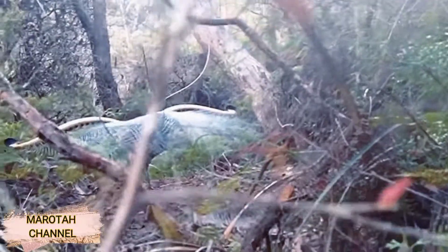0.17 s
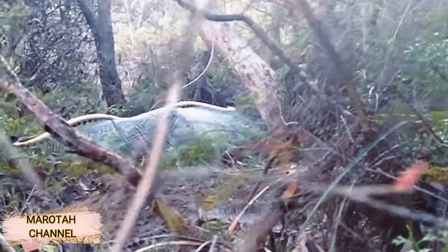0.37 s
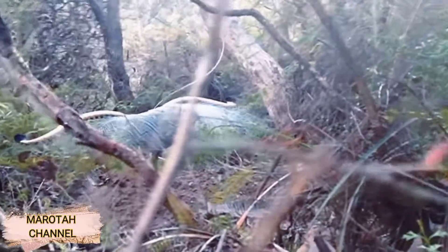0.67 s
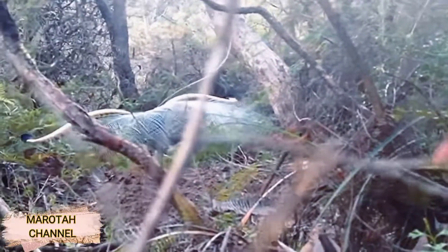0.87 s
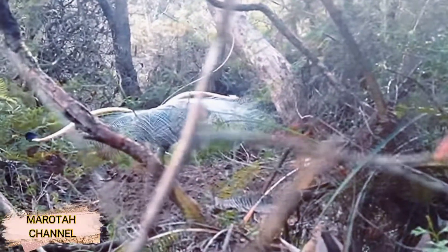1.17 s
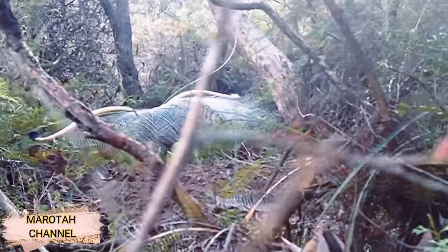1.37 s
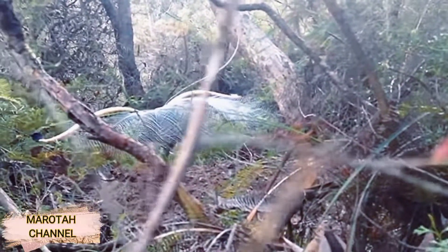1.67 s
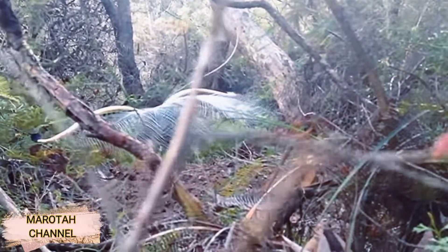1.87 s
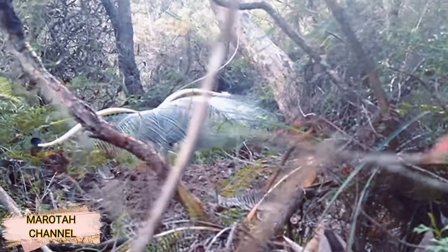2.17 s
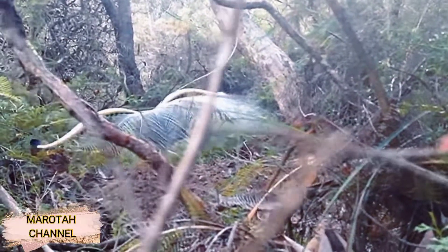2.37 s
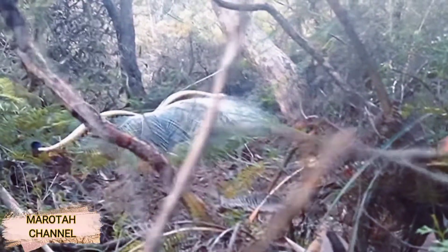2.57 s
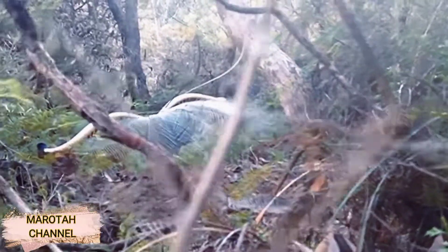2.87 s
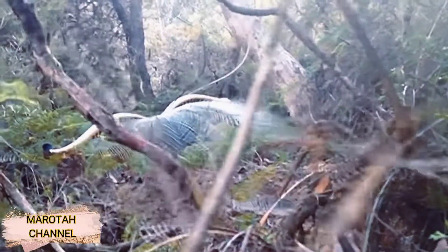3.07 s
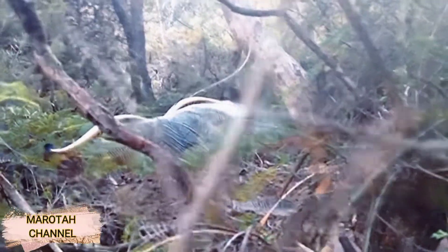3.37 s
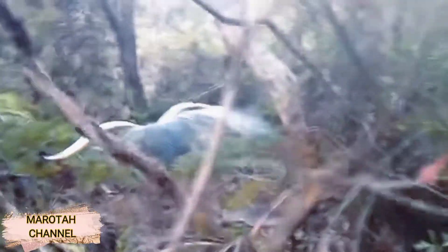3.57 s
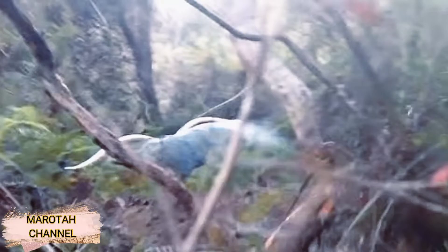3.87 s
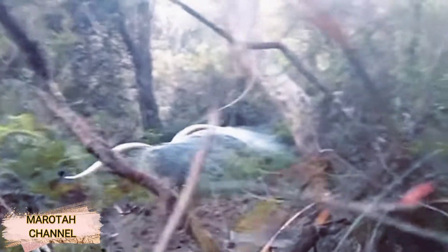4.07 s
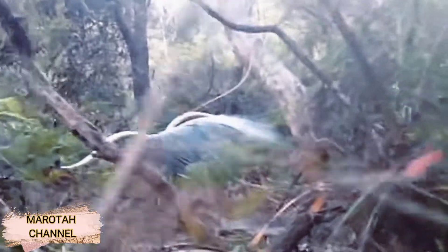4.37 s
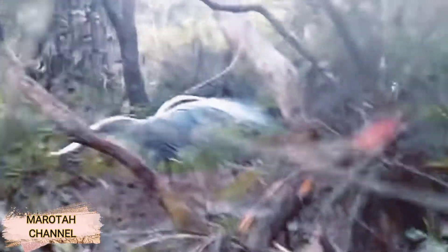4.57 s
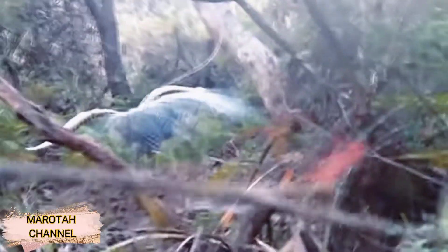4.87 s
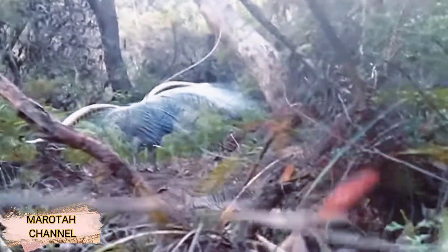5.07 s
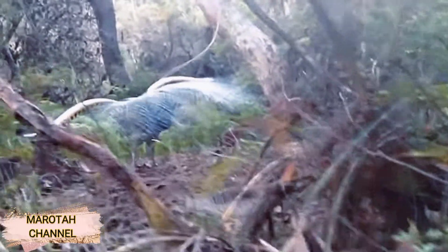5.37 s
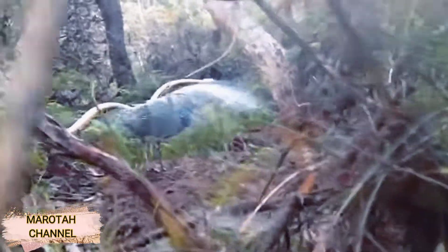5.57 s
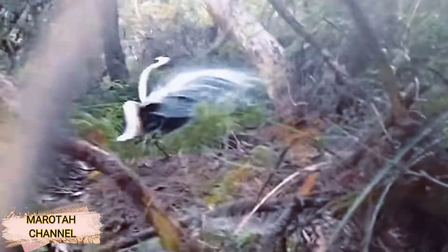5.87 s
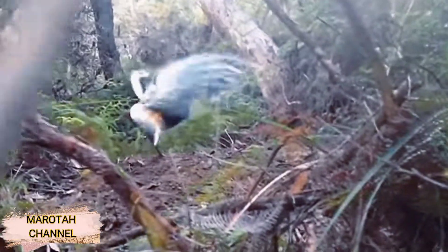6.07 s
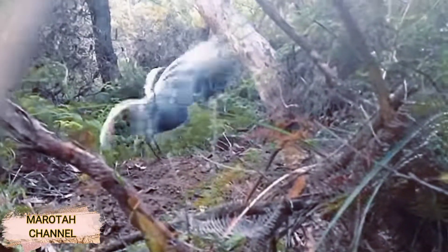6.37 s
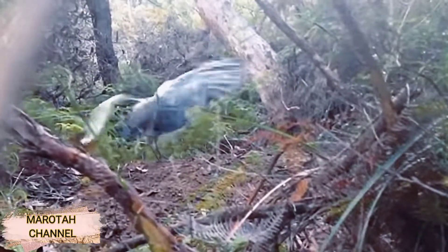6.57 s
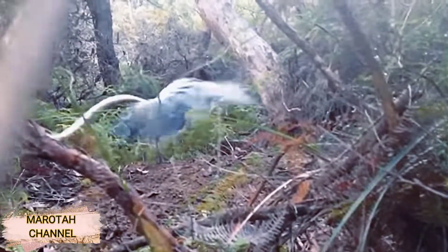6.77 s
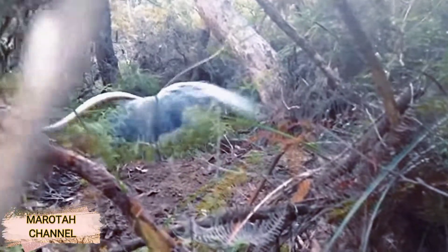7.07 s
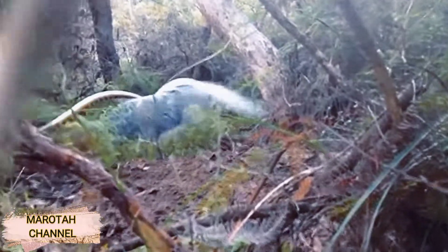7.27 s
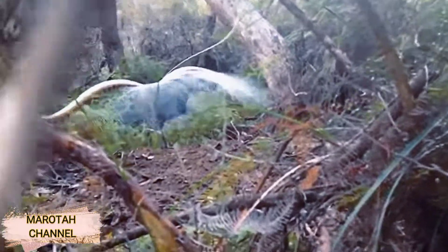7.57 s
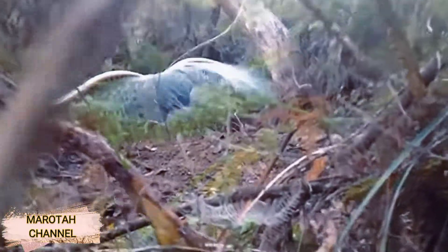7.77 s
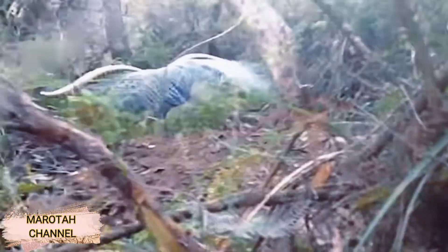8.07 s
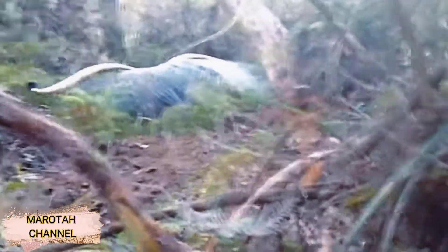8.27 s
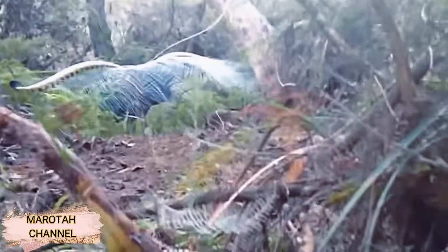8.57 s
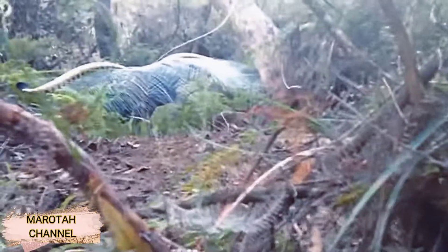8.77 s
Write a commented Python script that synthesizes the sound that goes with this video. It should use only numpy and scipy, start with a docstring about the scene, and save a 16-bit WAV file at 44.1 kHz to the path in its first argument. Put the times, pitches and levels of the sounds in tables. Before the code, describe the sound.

A lyrebird performs a few metres away in a forest, over soft air noise and a faint, distant low drone. It opens with quiet, high, raspy chirps and a sharp click. At about 0.85 seconds, low pops start a loud hiss that lasts until 2.1, ending in a faint trill. Three short, hoarse warbles follow between 2.3 and 2.8. From 3 seconds the bird pours out loud wavering whistles, falling sweeps and trills, mixed with sharp clicks and short rasps, while its feet rustle dry leaves on and off. The song thins to softer chirps and snaps around 5.3 to 6, then bursts into sharp, quick notes, with one steady whistle near 6.9. Chopped buzzes come just after 7 and around 8, alongside a high wavering whistle. Short rough squawks, rasps and clicks fill the rest, until about 8.9. The notes echo briefly off the trees.

```python
"""Lyrebird display in a forest

A few metres away the bird throws whistles and fast warbles from both sides of its syrinx, with a long
hiss, chopped buzzes, squawks, short rasps and clicks, while its feet stir dry litter. Trunks answer
briefly, and a far low drone and air noise lie underneath. Drone, air, litter and echo tail
duck on cue around the loud notes."""
import sys
import numpy as np
from scipy import signal
from scipy.fft import rfft, irfft, next_fast_len
from scipy.io import wavfile
from scipy.ndimage import uniform_filter1d, map_coordinates

SR = 44100
rng = np.random.default_rng(int(sys.argv[2]) if len(sys.argv) > 2 else 0)


def store_pcm(level_fs):
    """Save levels as 16-bit WAV."""
    pcm = np.round(np.clip(level_fs, -1, 1) * 32767).astype(np.int16)
    wavfile.write(sys.argv[1], SR, np.atleast_2d(pcm).T)


N = 392931

# Tone of the far rumble: f/Hz, relative level/dB
DRONE_SPECTRUM = [(15, -55), (25, -74), (47, -4.5), (97, -1), (162, -4.5), (198, -9), (335, -22),
                  (399, -40), (500, -40.5), (650, -77), (1100, -120)]
# Tone of the air: f/Hz, relative level/dB
AIR_SPECTRUM = [(180, -6), (300, -3.5), (900, -9), (978, -13), (1230, -11), (1410, -14), (2100, -10.5),
                (6300, -13), (14700, -18), (16000, -12)]
# Tone of the dry leaves: f/Hz, relative level/dB
LEAF_SPECTRUM = [(240, -43), (400, -3), (839, -0.5), (964, -3.5), (1180, -1.5), (1290, 1), (4110, 1),
                 (14600, -11), (15300, -29), (16000, -38)]
# Fader ride on the drone: t/s, level/dB
DRONE_LEVEL = [(0, -30), (.8, -30), (1.7, -31), (1.8, -22), (2.3, -28.5), (3.1, -26.5), (4.1, -29),
               (4.9, -32), (5.8, -28.5), (6.35, -29.5), (7.7, -27), (8.4, -38), (8.6, -27), (8.91, -32)]
# Bouts of scratching in the litter: t/s, length/s, peak/dB, peak position/0-1, fade/dB
SCRATCHES = [(2.87, 0.53, -24, 0.76, 11), (3.286, 0.93, -22.5, 0.22, 3), (4.127, 1.24, -19, 0.17, 13.5),
             (5.325, 0.92, -22, 0.15, 10), (6.98, 1, -23, 0.59, 13), (8.137, 0.82, -26.5, 0.09, 22)]
# Ducking cues for background, litter and echo tail: t/s, depth/dB, hold/s
DUCKS = [(0.001, 3.5, 0.001), (0.902, 12, 0.99), (3.228, 9.5, 0.083), (3.556, 7.5, 0.21),
         (4.124, 11.5, 0.016), (4.77, 2, 0.32), (5.323, 5, 0.0078), (6.105, 1, 0.041), (6.455, 9.5, .03),
         (6.669, 17, 0.045), (7.126, 10, .01), (7.262, 4, 0.0091), (7.842, 12.5, 0.23), (8.883, 10, .03)]
# First echoes off the nearest trunks: delay/s, relative level/dB
NEAR_TRUNKS = [(.006, -11), (.011, -12), (.017, -20.5), (.026, -17.5)]
# Decay of the echo tail: f/Hz, t60/s
TRUNK_DECAY = [(500, .3), (1800, .5), (2800, .55), (6000, .4), (12000, .2)]
# Echo send, how much of the voice reaches the far trunks: t/s, level/dB
ECHO_SEND = [(0, 3.5), (2.3, 0.5), (2.8, -1.5), (3.3, -1.5), (5.2, -0.5), (5.4, -17), (6.14, 1),
             (6.45, -8.5), (6.6, 9), (6.8, -12), (7.3, -16), (7.8, 4), (8.1, 5.5), (8.4, -0.5), (8.78, 4),
             (8.86, -10), (8.91, -12)]
# Low pops that open the hiss: t/s, level/dB, f/Hz
KNOCKS = [(0.838, -12, 160), (0.845, -17, 151), (0.852, -2, 805), (0.867, -13, 990), (0.875, -1, 151)]
# Envelope of the long hiss: t/s, level/dB, growl relative to the hiss/dB
HISS_LEVEL = [(0.87, -17.5, 4.5), (0.914, -19, -34), (0.928, -18, -20), (0.95, -11.5, -16),
              (1.872, -11, -17.5), (2.006, -16.5, -17), (2.072, -21, -11), (2.1, -42, -8)]
# Throat resonances of the hiss: f/Hz, width/Hz, level/dB
HISS_THROAT = [(1680, 760, -8.5), (2876, 225, -1), (4290, 420, 1.5), (5120, 240, 1.5), (5580, 460, 1),
               (7850, 1360, -8.5), (9010, 1260, -10.5), (11300, 1400, -49)]
# Throat resonances of its low growl, applied twice: f/Hz, width/Hz, level/dB
GROWL_THROAT = [(791, 350, 1), (1090, 450, 5)]
# Clicks and snaps: t/s, peak/dB, ring f/Hz, t60/s, ring share/0-1
CLICKS = [(0.4838, -4.5, 2500, 0.058, 0), (0.7657, -20, 2830, 0.025, 0), (3.0747, -6.5, 2360, 0.026, 0.2),
          (3.1021, -5, 3600, 0.025, 0.45), (3.1918, -6, 2290, 0.017, 0.2), (3.2066, 1.5, 2400, 0.011, 0.16),
          (3.2465, 0.5, 2420, 0.017, 0.24), (3.389, -7.5, 2210, 0.042, 0.58),
          (3.4934, -1.5, 2700, 0.022, 0.6), (4.1363, -0.5, 1805, 0.015, 0.1),
          (4.4057, -8, 1727, 0.045, 0.3), (4.5615, -1.5, 2860, 0.041, 0.26),
          (4.576, -5.5, 1916, 0.014, 0.4), (4.6185, -7, 4860, 0.018, 0.1),
          (4.6374, -1.5, 2930, 0.037, 0.14), (4.7677, 1.5, 3010, 0.013, 0.96),
          (4.8588, -3, 4230, 0.029, 0.43), (4.974, -5, 2520, 0.025, 0.43), (5.1877, -7, 2420, 0.012, 1),
          (5.3171, 2.5, 2870, 0.014, 0.64), (5.3556, -15, 5000, 0.035, 0.6), (5.7357, -7, 2100, 0.11, 0),
          (6.0304, -4, 4820, 0.018, 0.42), (6.398, -3, 1740, 0.034, 0.8), (6.976, -14, 2140, 0.039, 0.47),
          (7.358, -12, 4340, 0.054, 0.1), (7.5297, -9.5, 1930, 0.032, 0), (8.1204, -22, 4260, 0.025, 0.3),
          (8.336, -10.5, 4230, 0.063, 0), (8.8008, -4.5, 2590, 0.019, 0.1),
          (8.8714, 3.5, 3000, 0.012, 0.68)]
# Rasps: t/s, length/s, level/dB, puff rate/Hz, first f/Hz, last f/Hz, width/Hz
RASPS = [(0.163, 0.05, -38.5, 57, 2400, 2340, 500), (0.151, 0.092, -33.5, 120, 5900, 4730, 2500),
         (0.277, 0.076, -33.5, 94, 6000, 5200, 2500), (0.388, 0.087, -30.5, 77, 5670, 4750, 2500),
         (0.508, 0.083, -28, 116, 5650, 4760, 2500), (0.653, .06, -30, 190, 5300, 5400, 2500),
         (0.656, 0.063, -32, 150, 7100, 7550, 1200), (0.836, 0.16, -17, 121, 2070, 3350, 3680),
         (2.957, 0.11, -28, 123, 1070, 1330, 900), (1.859, 0.35, -34, 71, 990, 855, 503),
         (3.756, 0.12, -21.5, 83, 2060, 2000, 1180), (4.697, 0.12, -24, 96, 1790, 1960, 693),
         (4.906, 0.11, -19, 190, 2730, 2230, 1220), (5.356, 0.053, -21.5, 123, 4800, 5100, 1190),
         (5.618, 0.073, -18.5, 280, 4740, 5370, 1500), (6.396, 0.024, -24, 570, 6300, 2570, 3020),
         (8.352, 0.034, -21, 250, 5350, 3930, 1480), (8.431, 0.047, -18.5, 220, 5700, 3700, 1480),
         (8.565, 0.046, -25.5, 700, 4700, 3940, 2470), (8.734, 0.053, -28, 880, 4350, 3800, 2430)]
# Chopped buzzes: t/s, length/s, level/dB, pulse rate/Hz, low cut/Hz
BUZZES = [(7.088, 0.013, -23.5, 320, 400), (7.1178, 0.011, -11.5, 504, 400), (7.226, 0.021, -20, 310, 400),
          (7.2591, 0.008, -10.5, 520, 400), (7.833, 0.048, -12, 178, 1530),
          (8.026, 0.042, -13.5, 185, 1540)]
# Throat resonances of the buzzes: f/Hz, width/Hz, level/dB
BUZZ_THROAT = [(780, 550, -7), (2040, 340, 0), (4300, 600, 0), (6450, 510, -2.5), (8550, 2100, -12.5)]
# Rough voiced squawks: t/s, length/s, level/dB, first f/Hz, middle f/Hz, last f/Hz
SQUAWKS = [(8.202, 0.037, -23, 1220, 1620, 2830), (8.288, 0.04, -22, 1042, 1148, 1010),
           (8.347, 0.034, -22, 1046, 1200, 1040), (8.43, 0.034, -20, 920, 1262, 1006),
           (8.568, 0.021, -22.5, 1008, 1133, 980), (8.738, 0.028, -23, 1030, 1140, 980)]
# Throat colour of the squawks: f/Hz, relative level/dB
SQUAWK_THROAT = [(1000, -6.5), (2300, 1), (4300, 2), (5600, 1.5), (8000, -28)]
# Warbles, a pitch thrown up again and again:
# t/s, length/s, level/dB, throw rate/Hz, low f/Hz, first top f/Hz, f the top sinks toward/Hz
WARBLES = [(2.346, 0.05, -13, 72, 1246, 3170, 1807), (2.544, 0.039, -17.5, 56, 836, 3300, 2296),
           (2.719, 0.0355, -19.5, 59, 878, 2930, 2180)]
# Short whistled sweeps:
# t/s, length/s, first f/Hz, middle f/Hz, last f/Hz, peak/dB, peak position/0-1, fade/dB, octave/dB
SWEEPS = [(0.038, 0.12, 6360, 7030, 6900, -35, 0.35, 11, -27),
          (0.196, 0.063, 6440, 6900, 7100, -33.5, 0, 4, -22),
          (0.32, 0.062, 6100, 6840, 6800, -34, 0, 2, -27),
          (0.403, 0.11, 5730, 6320, 6870, -30.5, 0.6, 8, -10),
          (1.045, 0.03, 1970, 2500, 3110, -20.5, 0, 20, -33),
          (2.981, 0.062, 1030, 1336, 1220, -22, 0.4, 5, -16),
          (3.48, 0.069, 1693, 1707, 943, -10, 0.38, 8, -23),
          (3.909, 0.056, 1680, 1637, 1530, -19.5, 0.75, 1, -14),
          (4.915, 0.068, 1553, 1540, 1537, -21, 0, 2, -3),
          (5.368, 0.074, 1875, 1320, 980, -34, 0.6, 14, -22),
          (5.49, 0.034, 2370, 1750, 1400, -26, 0, 9, -25),
          (5.654, 0.06, 1460, 1160, 890, -26, 0.35, 7, -20),
          (5.76, 0.027, 2150, 1713, 1350, -25, 0.4, 3, -24),
          (6.152, 0.086, 2050, 1290, 850, -19.5, 0.56, 29, -15),
          (6.459, 0.043, 2314, 2236, 2130, -1.5, 0.06, 33, -26.5),
          (6.54, 0.035, 1530, 1554, 1570, -21, 0.3, 20, -21),
          (6.611, 0.054, 2030, 1324, 980, -27, 0, 19, -10.5),
          (7.404, .088, 1590, 2256, 2570, -14, 0.1, 18, -11.5),
          (7.84, 0.095, 4450, 4120, 4030, -14.5, 0.27, 18, -29),
          (8.119, 0.021, 400, 414, 427, -25, 0.23, 22, -36),
          (8.242, 0.0079, 440, 456, 460, -15.5, 0.82, 35, -17)]
# Longer or more crooked whistles: octave overtone/dB, waver/Hz, [t/s, f/Hz, level/dB]
NOTES = [(-35, -3, [(1.068, 3950, -16), (1.102, 3880, -17.5), (1.238, 2760, -15.5), (1.316, 1850, -22.5),
         (1.33, 1800, -38)]), (-15.5, -4, [(6.078, 1974, -18), (6.086, 1566, -11), (6.099, 1574, -4),
         (6.11, 1595, -18), (6.135, 1620, -37)]), (-21, 11, [(1.95, 578, -50), (2.04, 579, -39),
         (2.1, 580, -32), (2.15, 598, -29.5), (2.17, 640, -39)]), (-34, 3, [(3.19, 2264, -28),
         (3.258, 2236, -26), (3.31, 2154, -11), (3.39, 2087, -7.5), (3.42, 1970, -18)]),
         (-31, 0, [(3.4, 2030, -12), (3.42, 2390, -18), (3.446, 2800, -18)]),
         (-11.5, 29.5, [(3.445, 2770, -25), (3.467, 2870, -15), (3.501, 2660, -10), (3.539, 2760, -10),
         (3.549, 2890, -10), (3.563, 2740, -7), (3.575, 2660, -7.5), (3.597, 2789, -7.5), (3.611, 2626, -5),
         (3.623, 2683, -7), (3.641, 2606, -7.5), (3.673, 2665, -7), (3.689, 2807, -6.5), (3.747, 2704, -10),
         (3.755, 2630, -14)]), (-22, 45, [(3.754, 2613, -10), (3.81, 2746, -10), (3.854, 2507, -8.5),
         (3.9, 2286, -13.5), (3.925, 2075, -15), (3.966, 2080, -15), (3.98, 1920, -9)]),
         (-21, 9.5, [(3.979, 1974, -14), (4.046, 2050, -10.5), (4.128, 1807, -7), (4.144, 1762, -16),
         (4.206, 1706, -19.5), (4.304, 1686, -13.5), (4.35, 1550, -16)]), (-11, 18, [(4.349, 1520, -17),
         (4.372, 1487, -15.5), (4.383, 1275, -21), (4.395, 1503, -15.5), (4.414, 1406, -16),
         (4.425, 1110, -16.5), (4.5, 1041, -16), (4.575, 924, -20.5), (4.68, 977, -24), (4.7, 760, -29)]),
         (-23, 5, [(3.68, 870, -22), (3.7, 1410, -15), (3.716, 2090, -11), (3.78, 1313, -16.5)]),
         (-35, 0.5, [(3.9, 4574, -32), (3.912, 4400, -22), (3.93, 4756, -28), (3.968, 3690, -10.5),
         (4.036, 2166, -10), (4.104, 1358, -16.5)]), (-38, 11, [(4.79, 5950, -38), (4.82, 6570, -31),
         (4.836, 6460, -25), (4.845, 5100, -28), (4.86, 4340, -32), (4.928, 2307, -9.5),
         (4.96, 1880, -16)]), (-33, 17, [(5.045, 2000, -27), (5.062, 1932, -11), (5.091, 1430, -8.5),
         (5.106, 940, -21.5), (5.155, 730, -27)]), (-12, 7, [(6.121, 3030, -38), (6.126, 3030, -8),
         (6.132, 3030, -6.5), (6.135, 2630, -11), (6.15, 2800, -11.5)]), (-33, 2, [(6.396, 835, -8),
         (6.405, 1455, -12), (6.416, 1734, -11.5), (6.425, 610, -10.5), (6.432, 680, -26)]),
         (-27, 10, [(6.396, 1650, -3), (6.401, 1920, -16), (6.405, 2950, -22), (6.412, 3200, -34)]),
         (-16, 0, [(6.579, 2570, -11), (6.585, 3040, -20), (6.591, 2360, -11.5), (6.597, 2470, -15)]),
         (-15.5, -3, [(6.664, 3680, -7), (6.673, 3075, -4.5), (6.686, 3500, -3.5), (6.701, 4455, -6.5),
         (6.709, 4340, -7), (6.717, 4460, -46)]), (-51, 0, [(6.76, 3040, -34), (6.796, 2920, -21),
         (6.894, 2900, -10), (6.945, 2910, -16.5), (6.958, 3030, -16.5), (6.968, 3120, -38)]),
         (-19, 0, [(7.462, 780, -32), (7.468, 1140, -21), (7.472, 1310, -21), (7.498, 1440, -26),
         (7.504, 2150, -22), (7.508, 2150, -29)]), (-25, 14, [(7.935, 4450, -32), (7.958, 4570, -13),
         (7.975, 4160, -9.5), (7.995, 4040, -8), (8.008, 4060, -18), (8.024, 4120, -17)]),
         (-22, 20, [(8.04, 4290, -10), (8.058, 4740, -14), (8.084, 4154, -18.5), (8.13, 4310, -26)]),
         (-34, -5, [(8.205, 1380, -42), (8.219, 1805, -21), (8.243, 3700, -23.5), (8.272, 3690, -26),
         (8.285, 3570, -43)])]
# Trills on those notes: t/s, length/s, flick rate/Hz, swing/Hz, rise share/0-1, sharpness, swing/dB
TRILLS = [(1.951, .206, 39, 365.6, 0.27, 0.77, 13), (4.333, 0.077, 25, 300, 0.83, 5.2, 2.5),
          (4.41, 0.11, 24, 520, 0.77, 4.9, 3.5), (4.492, .083, 24, 219, 0.87, 2.04, -3)]

# The hiss beats in groups of pulses: rate/Hz, [multiple of the rate, depth/dB]
RATTLE_HZ, RATTLE = 52.8, [(1, 1.0), (3, 1.6), (4, 1.6)]
ONSET_DB = 13.5  # a swell starts this far under its peak
RECOVER_S, SINK_S = 0.28, 0.011  # ducking: time constant of the return, length of the fall
AIR_DB, ECHO_DB = -29.5, -11
TOP_HZ = 15500


def amp(db):
    """Gain of a level in dB."""
    return 10 ** (np.asarray(db) / 20)


def unit(x):
    """x at rms 1."""
    return x / np.sqrt(np.mean(x ** 2) + 1e-20)


def along(points, hz):
    """(Hz, value) points on a log axis."""
    f, v = np.transpose(points)
    return np.interp(np.log(hz + 1), np.log(f + 1), v)


def curves(rows):
    """One value per sample for each column after the time, silent outside the rows."""
    s, *cols = np.transpose(rows)
    return [np.interp(np.arange(N) / SR, s, c, -120, -120) for c in cols]


def wobble(rate, size=N):
    """A smooth random curve, rate knots a second."""
    return map_coordinates(rng.standard_normal(int(size * rate / SR) + 4), [np.arange(size) * rate / SR])


def filtered(x, response):
    """x times a complex response of frequency."""
    m = next_fast_len(x.shape[-1] + 4096)
    return irfft(rfft(x, m) * response(np.fft.rfftfreq(m, 1 / SR)), m)[..., :x.shape[-1]]


def throat(modes):
    """Causal response of (Hz, width, dB) resonances."""
    return lambda f: sum((-1) ** k * amp(db) * 1j * f * w / (c * c - f * f + 1j * f * w)
                         for k, (c, w, db) in enumerate(modes))


def add(track, s, sound):
    """Mixes a sound into the track at time s."""
    part = track[round(s * SR):][:len(sound)]
    part += sound[:len(part)]


def swell(u, peak_db, peak_at, fade_db):
    """Level in dB as u runs from 0 to 1: a rounded rise to the peak, then a rounded fade."""
    peak_at = np.clip(peak_at, .02, .98)
    rise, fall = 1 - u / peak_at, (u - peak_at) / (1 - peak_at)
    return peak_db - np.where(u < peak_at, ONSET_DB * rise ** 2, fade_db * fall ** 2)


def pitch_arc(u, pitches):
    """A parabola through a first, middle and last pitch as u runs from 0 to 1."""
    return np.polyval(np.polyfit([0, .5, 1], pitches, 2), u)


def background():
    """The bed: far rumble, a wavering hum that drops back halfway, and smooth air noise."""
    drone_db, = curves(DRONE_LEVEL)
    rumble = filtered(rng.standard_normal(N), lambda f: amp(along(DRONE_SPECTRUM, f)))
    hum = np.sin(2 * np.pi * np.cumsum(94.5 + 1.48 * wobble(6)) / SR) * amp(3.8 * wobble(7.3))
    hum_fade = np.interp(np.arange(N) / SR, [4.0, 4.6], [1, .15])
    air = filtered(rng.standard_normal(N), lambda f: amp(along(AIR_SPECTRUM, f)))
    drone = unit(rumble * amp(2.65 * wobble(7))) + 1.05 * hum_fade * unit(hum)
    return amp(drone_db) * drone + amp(AIR_DB) * unit(air)


def litter():
    """Feet in dry leaves: small cracks of uneven size that come in clumps, over a soft rustle."""
    gain = np.zeros(N)
    for s, length, db, peak_at, fade_db in SCRATCHES:
        add(gain, s, amp(swell(np.linspace(0, 1, int(length * SR)), db, peak_at, fade_db)))
    cracks_per_s = 500 * amp(4 * wobble(30))
    strength = amp(5.2 * np.minimum(rng.exponential(size=N), 3))
    impulses = (rng.random(N) < cracks_per_s / SR) * strength * rng.standard_normal(N)
    one_crack = rng.standard_normal(200) * amp(-60 * np.arange(200) / SR / 0.0029)
    cracks = signal.fftconvolve(impulses, one_crack)[:N]
    rustle = rng.standard_normal(N) * amp(2.5 * wobble(40))
    leaves = filtered(0.65 * unit(cracks) + unit(rustle), lambda f: amp(along(LEAF_SPECTRUM, f)))
    return gain * unit(leaves)


def ducking():
    """Gain that falls at each cue, holds and creeps back; the deepest dip rules."""
    t = np.arange(N) / SR
    depths = [(t >= s) * db * np.exp(-np.maximum(t - s - hold, 0) / RECOVER_S) for s, db, hold in DUCKS]
    return amp(-uniform_filter1d(np.max(depths, axis=0), size=round(SINK_S * SR), mode="nearest"))


def far_trunks(voice):
    """Scattered echoes, each frequency dying at its own speed; they change as the bird moves."""
    send = voice * amp(curves(ECHO_SEND)[0])
    out, step = np.zeros(N), SR // 3
    for start in range(0, N, step):  # a fresh tail every third of a second
        hz, t, noise = signal.stft(rng.standard_normal(step), SR, nperseg=256)
        tail = signal.istft(noise * amp(-60 * t / along(TRUNK_DECAY, hz)[:, None]), SR, nperseg=256)[1]
        echo = signal.fftconvolve(send[start:start + step], tail / np.linalg.norm(tail))
        add(out, start / SR + .008, echo)
    # leaves swallow the top, soil the bottom
    return amp(ECHO_DB) * filtered(out, throat([(2540, 4300, 0.01)]))


def near_trunks(voice):
    """Tight slaps off the nearest trunks."""
    return amp(-6.5) * sum(amp(db) * np.roll(voice, round(s * SR)) for s, db in NEAR_TRUNKS)


def knocks():
    """Low pops at the front of the hiss, each a heavily damped tone."""
    out, t = np.zeros(N), np.arange(0, .03, 1 / SR)
    attack = 1 - np.exp(-t / 0.00024)
    for s, db, hz in KNOCKS:
        add(out, s, -amp(db - 60 * t / 0.0084) * np.cos(2 * np.pi * hz * t) * attack)
    return out


def hiss():
    """Turbulent air, faintly rattling, through steady throat resonances and one narrow notch."""
    db, growl_db = curves(HISS_LEVEL)
    beat = 2 * np.pi * np.cumsum(RATTLE_HZ * (1 + .012 * wobble(5))) / SR
    rattle_db = sum(depth_db * np.cos(k * beat + k * k) for k, depth_db in RATTLE)
    air = rng.standard_normal(N) * amp(rattle_db + .8 * wobble(300))
    notch = lambda f: 1 - 0.76 / (1 + ((f - 6530) / 150) ** 2)
    band = lambda f: 1 / (1 + (900 / (f + 1)) ** 6) / (1 + (f / 13000) ** 12)
    bright = filtered(air, lambda f: throat(HISS_THROAT)(f) * notch(f) * band(f))
    growl = filtered(air, lambda f: throat(GROWL_THROAT)(f) ** 2)
    return amp(db) * unit(bright) + amp(db + growl_db) * unit(growl)


def clicks():
    """Noise bursts, partly ringing in one resonance; each gets a brief fade-in, longer for ringing ones."""
    out, t = np.zeros(N), np.arange(-.012, .09, 1 / SR)
    for s, db, hz, t60, ring_share in CLICKS:
        fade_in = 0.29 * np.exp(t / (0.00076 + 0.0055 * ring_share ** 2))
        envelope = np.where(t > 0, amp(-60 * t / t60), fade_in)
        burst = rng.standard_normal(len(t)) * uniform_filter1d(envelope, size=30)
        wide = filtered(burst, lambda f: throat([(2800, 6000, 0)])(f) / (1 + 1j * f / 14000) ** 2)
        ring = filtered(burst, lambda f: throat([(hz, 1200, 0)])(f) ** 2)
        snap = (1 - ring_share) * unit(wide) + ring_share * unit(ring)
        add(out, s + t[0], amp(db) * snap / np.abs(snap).max())
    return out


def puffs(length, rate, jitter, sharp, pop):
    """Air released in pulses: a pop, then noise that dies within the cycle."""
    size = int(length * SR)
    cycle = np.cumsum(rate * (1 + jitter * wobble(rate, size=size))) / SR % 1
    starts = np.diff(cycle, prepend=1) < 0
    return pop * starts + np.exp(-sharp * cycle) * rng.standard_normal(size)


def rasps():
    """Puffs of air crossfade from a first to a last throat shape; the beak dulls the top."""
    out = np.zeros(N)
    for s, length, db, rate, first_hz, last_hz, width in RASPS:
        air = puffs(length, rate, jitter=.12, sharp=1.8, pop=1.4)
        air = filtered(air, lambda f: 1 / (1 + 1j * f / 6500) ** 3)
        u = np.linspace(0, 1, len(air))
        shapes = [throat([(.66 * hz, .5 * width, -3), (hz, .8 * width, 0)]) for hz in (first_hz, last_hz)]
        first, last = (unit(filtered(air, lambda f: shape(f) ** 2)) for shape in shapes)
        envelope = np.sin(np.pi * u ** 0.58) ** 1.22
        add(out, s, amp(db) * unit(((1 - u) * first + u * last) * envelope))
    return out


def buzzes():
    """Regular pulses ring the throat, separate at first, then blur in rising breath and die away."""
    out = np.zeros(N)
    for s, length, db, rate, low_cut_hz in BUZZES:
        pulses = puffs(length, rate, jitter=.02, sharp=4, pop=2.5)
        u = np.linspace(0, 1, len(pulses))
        breath = .7 * u ** 2 * rng.standard_normal(len(u))
        envelope = np.clip(np.minimum(.4 + 5 * u, 3.3 * (1 - u)), 0, 1)
        air = np.pad((pulses + breath) * envelope, (0, 200))  # room to ring out
        band = lambda f: (1j * f / (1j * f + low_cut_hz)) ** 3 / (1 + 1j * f / 11000) ** 2
        add(out, s, amp(db) * unit(filtered(air, lambda f: throat(BUZZ_THROAT)(f) * band(f))))
    return out


def squawks():
    """Seven harmonics weighted by the throat, each shaken by uneven airflow, over a scratch of air."""
    out, shake_db = np.zeros(N), 6
    for s, length, db, *pitches in SQUAWKS:
        u = np.linspace(0, 1, int(length * SR))
        pitch = pitch_arc(u, pitches)
        phase = 2 * np.pi * np.cumsum(pitch) / SR
        stack = sum(amp(along(SQUAWK_THROAT, k * pitch) + shake_db * wobble(488, len(u)))
                    * np.sin(k * phase + k * k) for k in range(1, 8))
        scratch = filtered(rng.standard_normal(len(u)), throat([(5460, 2100, 0)]))
        envelope = np.sin(np.pi * u) ** 0.67
        add(out, s, amp(db) * unit((unit(stack) + 0.38 * unit(scratch)) * envelope))
    return out


def warbles():
    """A hoarse voice whose pitch leaps up in about a quarter of each throw and sags back."""
    out, formants = np.zeros(N), throat([(1600, 1500, 0), (4700, 2000, -1)])
    for s, length, db, rate, low_hz, first_hz, toward_hz in WARBLES:
        t = np.arange(0, length, 1 / SR)
        throw = np.interp(t * rate % 1, [0, .28, .7, 1], [0.12, 1, .15, 0.0021])
        throw = uniform_filter1d(throw, size=40)
        top_hz = toward_hz + (first_hz - toward_hz) * np.exp(-2.5 * t / length)
        phase = 2 * np.pi * np.cumsum(low_hz + (top_hz - low_hz) * throw) / SR
        hoarse = amp(2.6 * wobble(728, len(t)))
        tone = np.sin(phase) + .4 * throw * np.sin(2 * phase)
        breath = .6 * rng.standard_normal(len(t)) * (1 + np.sin(phase))
        voice = filtered((tone + breath) * hoarse, lambda f: formants(f) / (1 + 1j * f / 9000))
        add(out, s, amp(db) * unit(voice * np.sin(np.pi * t / length) ** 0.2))
    return out


def trill(t):
    """Quick flicks up in pitch and back: the offsets in Hz and dB at times t."""
    hz, db = np.zeros(len(t)), np.zeros(len(t))
    for s, length, rate, swing_hz, rise, sharpness, swing_db in TRILLS:
        active = (t > s) & (t < s + length)
        flick = active * np.interp((t - s) * rate % 1, [0, rise, 1], [0, 1, 0]) ** sharpness
        hz, db = hz + swing_hz * flick, db + swing_db * flick
    return hz, db


def whistle(pitch, level_db, overtone_db):
    """A sine on its pitch curve with a slight flutter; overtones grow as it is blown harder."""
    size = len(pitch)
    flutter = np.interp(level_db.max(), [-28, -10], [5, 1])  # faint notes break up
    pitch = uniform_filter1d(pitch, size=40) * (1 + 0.0042 * flutter * wobble(204.3, size))
    phase = 2 * np.pi * np.cumsum(pitch) / SR
    effort_db = .35 * (level_db - level_db.max())
    octave_gain = amp(overtone_db + effort_db + 2.4 * wobble(67.7, size))
    second = octave_gain * np.sin(2 * phase + .5 * wobble(300, size))
    third = 0.47 * octave_gain ** 2.04 * np.sin(3 * phase)
    t = np.arange(size) / SR
    edges = np.clip(np.minimum(t, t[::-1]) / 0.001, 0, 1)
    envelope = edges * amp(level_db + flutter * wobble(250, size))
    return np.sqrt(2) * (np.sin(phase) + second + third) * envelope


def whistles():
    """The lead: sweeps bend through three pitches; notes follow their curves, wavering and trilling."""
    out = np.zeros(N)
    for s, length, *pitches, db, peak_at, fade_db, overtone_db in SWEEPS:
        u = np.linspace(0, 1, int(length * SR))
        add(out, s, whistle(pitch_arc(u, pitches), swell(u, db, peak_at, fade_db), overtone_db))
    for overtone_db, waver_hz, points in NOTES:
        s, hz, db = np.transpose(points)
        t = np.arange(s[0], s[-1], 1 / SR)
        trill_hz, trill_db = trill(t)
        drift_hz = waver_hz * wobble(120.7, len(t))
        pitch = np.interp(t, s, hz) + trill_hz + drift_hz
        level_db = np.interp(t, s, db) + trill_db - 0.011 * drift_hz  # softer as it drifts sharp
        add(out, s[0], whistle(pitch, level_db, overtone_db))
    return out


def scene():
    """Mono mix: the bird up front, its hiss and knocks dry, the ducked forest behind."""
    voice = whistles() + warbles() + squawks() + clicks() + rasps() + buzzes()
    echo_tail = far_trunks(voice)
    foreground = voice + near_trunks(voice) + knocks() + hiss()
    forest = echo_tail + litter() + background()
    return (foreground + ducking() * forest)[None]


def record(dry):
    """Peaks round off at full scale; nothing is kept above the band limit."""
    loud = dry / (1 + np.abs(dry / 1.06) ** 8) ** (1 / 8)
    return filtered(loud, lambda hz: hz < TOP_HZ)


dry = scene()
out = record(dry)
store_pcm(out)
```